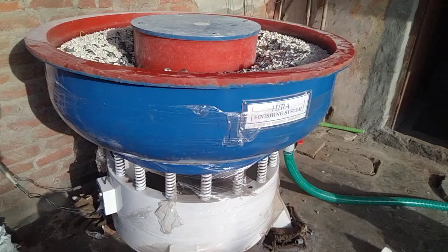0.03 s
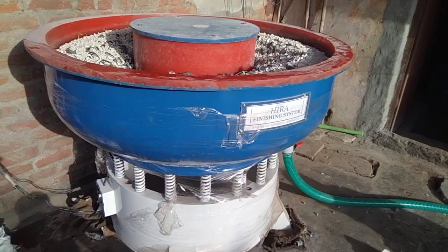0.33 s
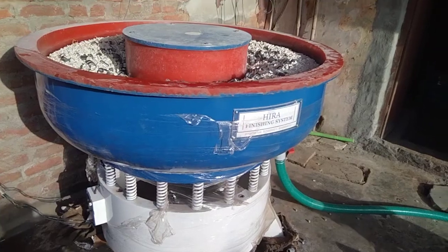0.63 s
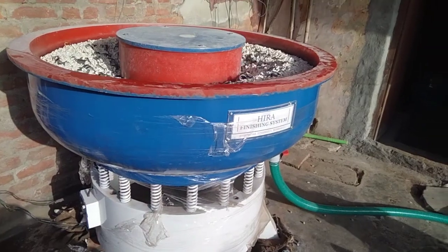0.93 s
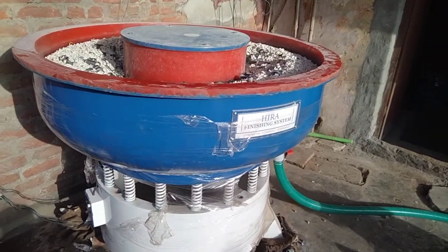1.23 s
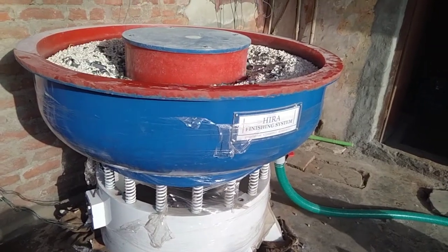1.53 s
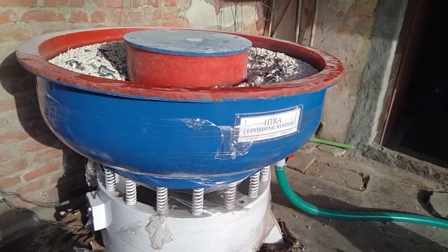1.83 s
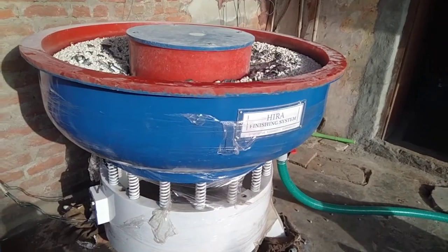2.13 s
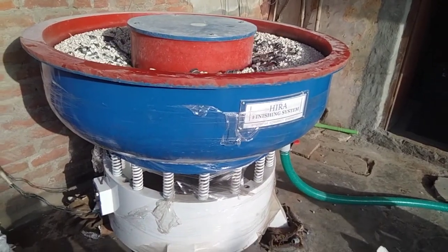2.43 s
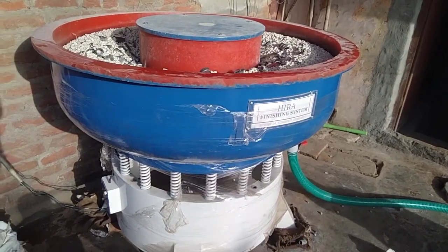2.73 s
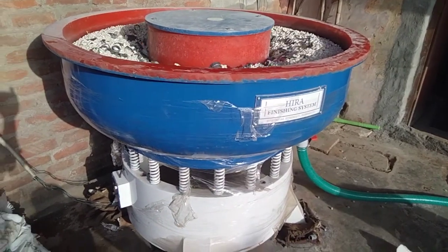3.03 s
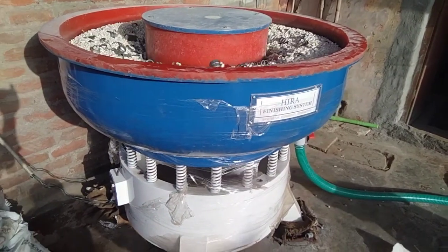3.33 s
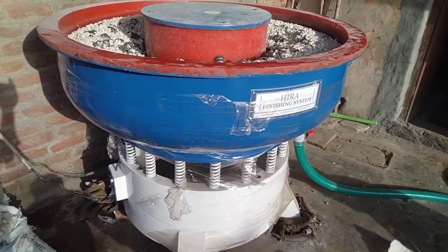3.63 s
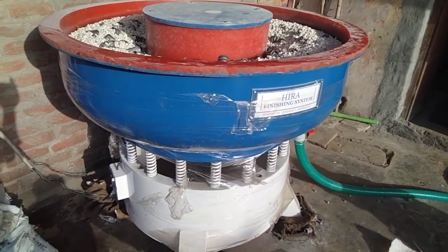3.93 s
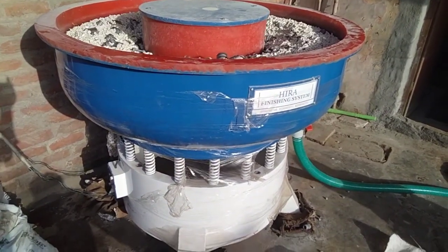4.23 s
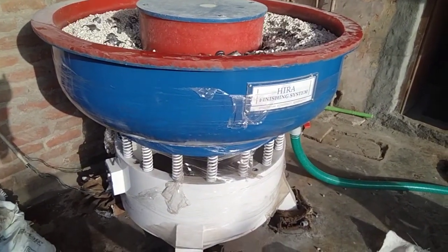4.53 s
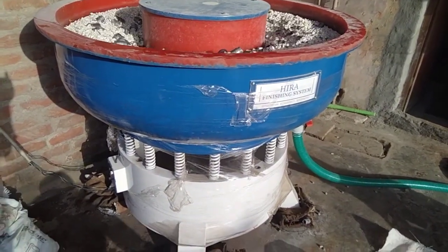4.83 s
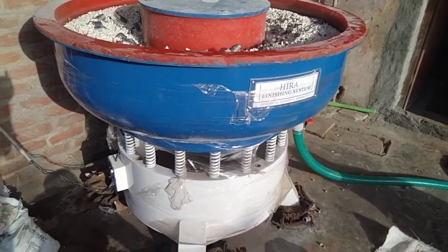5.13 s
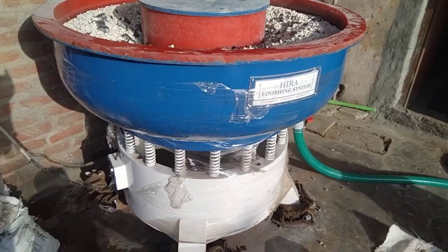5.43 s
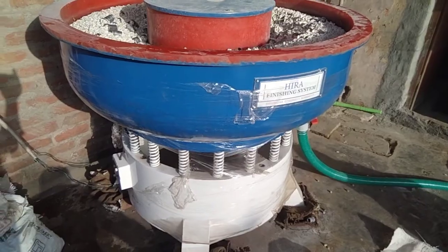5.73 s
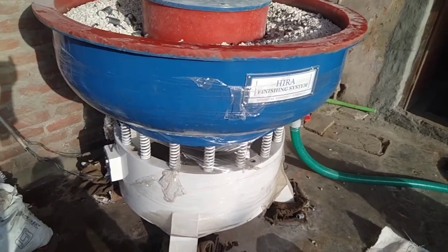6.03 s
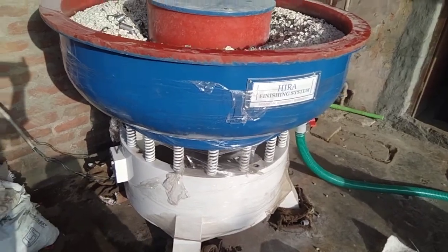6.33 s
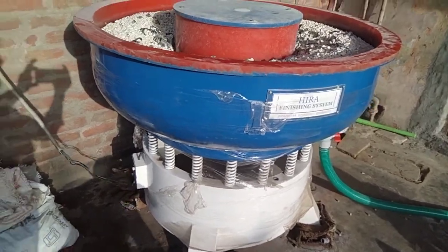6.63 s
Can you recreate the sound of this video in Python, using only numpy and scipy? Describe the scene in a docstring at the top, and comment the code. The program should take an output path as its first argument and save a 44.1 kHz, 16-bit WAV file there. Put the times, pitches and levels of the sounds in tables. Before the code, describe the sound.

After a brief silence, a vibratory finishing machine cuts in, already running close to a single microphone. Its steel bowl drums with a fast, steady rattle over a low shuddering rumble, and a ringing tone gently swells and fades. Ceramic chips click and hiss continuously on top. Steel parts clink now and then, sharpest around the middle, with another quick cluster near the end.

```python
"""A vibratory finishing bowl running on its springs beside a brick wall, close to one mono microphone.
An eccentric weight shakes it about 24 times a second: the load rattles against the steel bowl and the
base shudders on the ground. At the open top ceramic chips seethe, and steel parts clink as they surface.
The sound cuts in after a moment of silence; the sharpest clinks make the recorder's limiter duck."""
import sys
import numpy as np
from scipy.fft import rfft, irfft, next_fast_len
from scipy.io import wavfile
from scipy.ndimage import uniform_filter1d, minimum_filter1d, map_coordinates

SR = 44100
rng = np.random.default_rng(int(sys.argv[2]) if len(sys.argv) > 2 else 0)


def inscribe(sig):
    """Save sig as 16-bit PCM at rate SR to the path in sys.argv[1].

    A 1-D sig is mono; a 2-D sig holds one channel per row.
    Samples are clipped to [-1, 1] before scaling.
    """
    pcm = np.round(np.clip(np.atleast_2d(sig).T, -1, 1) * 32767)
    wavfile.write(sys.argv[1], SR, pcm.astype(np.int16))


N = 294588

SHAFT_HZ = 24.38
# how hard the load works: time_s, rattle_db, clatter_db, hiss_db
LOAD_LEVELS = [(.64, -37, -33.5, -34.5), (1.1, -35.5, -34.5, -31), (2.0, -34, -34, -29.5),
               (2.8, -34.5, -32, -31.5), (3.6, -34, -31, -32.5), (4.4, -34.5, -31, -32),
               (5.2, -34, -31.5, -33), (5.9, -34, -30.5, -33.5), (6.68, -35, -31.5, -31.5)]
# spectrum of the base shuddering on the ground: frequency_hz, level_db
RUMBLE_SPECTRUM = [(10, -17), (32, -4.5), (45, -3.5), (80, -0.5), (115, -5), (170, -8), (400, -27)]
# spectrum of chips knocking together: frequency_hz, level_db
CLICK_SPECTRUM = [(1200, -29.5), (2300, -4), (2700, -1), (3300, 0.5), (3750, -0.5), (4100, -3), (4900, -2),
                  (6000, 1), (6900, -6), (7600, -2), (9500, -27.5), (16000, -12)]
# spectrum of their fine scraping: frequency_hz, level_db
SCRAPE_SPECTRUM = [(3500, -25), (6000, -2), (7500, 1), (8800, 3.5), (9800, -2), (10700, -6), (11500, -2.5),
                   (12400, -5.5), (14000, -5), (15200, 0), (16000, -13)]
# hard, dead strikes of part on part: start_s, peak_db, centre_hz
DEAD_STRIKES = [(2.591, 1.5, 8000), (2.598, -15, 7140), (3.089, -3, 9100), (3.119, -11.5, 7200),
                (3.776, -17, 7000), (6.048, -13, 8100)]
# modes of a steel part: pitch_hz, level_db, ring_time_ratio
STEEL_MODES = [(2600, 29.5, 2.4), (3505, 1, 1.17), (4570, -1, 1), (5050, 4, 1.5), (5290, 8, 1.4),
               (5340, -5, 1.2), (5740, 4.5, 0.63), (6350, 10, 0.33), (7200, -21, .9), (7100, 1.5, 1),
               (7420, 5, 0.35), (7670, 2.5, 0.68), (7810, -10.5, 1.4), (9000, -9, .8), (8460, 6, 0.45),
               (8970, 2, 1.3), (9400, -22, 0.77), (9440, -10, .3), (11300, -5, 0.96), (12700, -5, .8),
               (12520, -3, 0.98), (13100, -9, .5), (13750, -7, .6), (14500, -6, .7), (15400, -8, .5)]
# one part knocks on another; a broader blow wakes more modes:
# start_s, level_db, pitch_hz, spread_octaves, chatter_s, other_pitch_hz, other_relative_db
PART_KNOCKS = [(0.98, -37, 3750, .03, .005, 8900, 0), (1.305, -35, 3700, 0.033, 0.0045, 8900, -8),
               (1.474, -30.5, 8720, .055, .035, 2680, -5), (2.301, -22, 8150, 0.31, 0.043, 5530, -10.5),
               (2.592, -23, 7000, 0.4, .012, 7350, -10), (3.088, -16.5, 7200, 0.54, .007, 9750, -2),
               (3.118, -18, 7600, 0.12, 0.05, 5230, -11), (3.417, -30, 7500, 0.025, .02, 7700, -8),
               (3.776, -24, 5800, .075, .003, 7400, -18), (3.839, -29, 7550, .03, 0.035, 8800, -4),
               (4.053, -27, 5750, 0.11, .01, 5400, -12), (4.474, -31, 2700, .1, .01, 7850, 2),
               (5.821, -28.5, 7200, 0.016, 0.0014, 7600, 8), (6.049, -23.5, 9300, .09, 0.011, 3600, -0.5),
               (6.069, -27, 8760, 0.26, .006, 5700, 2.5), (6.083, -21, 7900, 0.23, .008, 2900, -11),
               (6.09, -27, 13100, 0.28, 0.013, 4507, -1), (6.108, -20, 3550, 0.13, 0.0068, 7900, -1.5),
               (6.161, -28.5, 7500, 0.27, 0.0079, 3550, -13), (6.437, -33, 5340, .03, 0.04, 7500, 1),
               (6.665, -29, 9160, .03, .012, 7500, -12)]
# the lined bowl's broad response: frequency_hz, level_db
BOWL_SPECTRUM = [(50, -32), (120, -2.5), (210, -3.5), (335, 3.5), (385, 1.5), (425, -6.5), (520, 1.5),
                 (620, 0.5), (760, -2), (1130, -3), (1400, -4), (1900, -7), (2400, -11), (4000, -25)]
# resonances of the bowl's wall: pitch_hz, width_hz, level_db
BOWL_WALL_MODES = [(261.4, 2.3, 4), (846, 7.2, 1.5), (1150, 10.6, 1.5), (1293, 14, -6), (1590, 7.9, 1),
                   (1666, 13.5, -1), (2146, 61, -0.5), (2657, 66, -2), (2786, 46, 1.5), (3158, 41, 3)]
# its main resonance: pitch_hz, width_hz, level_db
MAIN_WALL_MODE = [(975, 54, 0)]
# rise and fall of that resonance: time_s, level_db
MAIN_MODE_SWELL = [(0.66, -43), (0.86, -46), (1.07, -39.0), (1.54, -42), (1.75, -38), (2.55, -47),
                   (2.75, -36), (3.02, -44.5), (3.4, -45), (3.58, -35.5), (3.82, -42), (4.0, -41),
                   (4.46, -46.5), (5.14, -39.5), (5.36, -43), (6.1, -40.5), (6.2, -43.0), (6.68, -39)]


def amp(db):
    """Decibels to gain."""
    return 10 ** (np.asarray(db) / 20)


def unit(x):
    """Scale to rms 1."""
    return x / np.sqrt(np.mean(x ** 2) + 1e-20)


def levels(rows):
    """One gain per sample for each dB column after the time."""
    time_s, *columns = np.transpose(rows)
    return [amp(np.interp(np.arange(N) / SR, time_s, db)) for db in columns]


def wobble(rate):
    """A smooth random curve, rate knots a second."""
    return map_coordinates(rng.standard_normal(int(N * rate / SR) + 4), [np.arange(N) * rate / SR])


def filtered(x, response):
    """x through a gain that depends on frequency."""
    size = next_fast_len(len(x) + SR // 2)
    return irfft(rfft(x, size) * response(np.fft.rfftfreq(size, 1 / SR)), size)[:len(x)]


def coloured(x, spectrum):
    """x through a (frequency_hz, level_db) spectrum, at rms 1."""
    hz, db = np.transpose(spectrum)
    return unit(filtered(x, lambda f: amp(np.interp(np.log(f + 1), np.log(hz), db))))


def resonate(x, modes):
    """x through (pitch_hz, width_hz, level_db) resonances, at rms 1."""
    return unit(filtered(x, lambda f: sum(
        amp(db) * 1j * f * width / (hz * hz - f * f + 1j * f * width) for hz, width, db in modes)))


def band(hz, centre_hz, octaves):
    """Weight that falls away on both sides of a centre frequency."""
    return 1 / (1 + (np.log2((hz + 1) / centre_hz) / octaves) ** 4)


def add(track, start_s, sound):
    """Mix a sound into a track."""
    part = track[round(start_s * SR):][:len(sound)]
    part += sound[:len(part)]


def swing():
    """The eccentric weight swings the bowl between -1 and 1 once a turn."""
    return np.cos(2 * np.pi * SHAFT_HZ * np.arange(N) / SR)


def collisions(per_s, depth, spread_db=0):
    """Random impacts of loose chips, thickest when the bowl rises into them."""
    hit = rng.random(N) < per_s / SR * (1 + depth * swing())
    size = rng.standard_normal(N) * amp(spread_db * rng.uniform(-1.2, 1, N))
    return unit(hit * size)


def ground_rumble():
    """Underneath, the base shudders on the ground."""
    _, clatter, _ = levels(LOAD_LEVELS)
    return amp(-11 + 0.63 * wobble(10)) * clatter * coloured(rng.standard_normal(N), RUMBLE_SPECTRUM)


def air_throb(level_db=-38.5):
    """The bowl pumps the air at the microphone once a turn."""
    return amp(level_db) * swing()


def buried_pings(per_s=130, low_hz=2600, high_hz=9800, t60_s=0.13, relative_db=-9):
    """Half-buried parts and chips ring faintly all the time."""
    _, clatter, _ = levels(LOAD_LEVELS)
    out, t = np.zeros(N), np.arange(SR // 8) / SR
    for when, pitch, size in rng.random((int(per_s * N / SR), 3)):
        hz = low_hz * (high_hz / low_hz) ** pitch
        envelope = amp(0.5 * np.log(size + .05) - 60 * t / t60_s)
        add(out, when * (N - 1) / SR, envelope * np.sin(2 * np.pi * hz * t))
    return amp(relative_db) * clatter * unit(out)


def ceramic_chips():
    """Thousands of ceramic chips click and scrape at the open top."""
    _, clatter, hiss = levels(LOAD_LEVELS)
    click_gain = clatter * amp(0.19 * wobble(12))
    clicks = coloured(collisions(per_s=9000, depth=.22), CLICK_SPECTRUM)
    scrape_gain = hiss * amp(0.86 * wobble(7.2))
    scrape = coloured(collisions(per_s=20000, depth=.18, spread_db=2.2), SCRAPE_SPECTRUM)
    return click_gain * clicks + scrape_gain * scrape


def dead_strikes(t60_s=0.022, octaves=0.32):
    """Parts held by the load meet with a bright crack and no ring."""
    out, t = np.zeros(N), np.arange(SR // 10) / SR
    for start_s, peak_db, centre_hz in DEAD_STRIKES:
        noise = filtered(rng.standard_normal(len(t)), lambda f: band(f, centre_hz, octaves))
        crack = noise * amp(-60 * t / t60_s)
        add(out, start_s, amp(peak_db) * crack / np.abs(crack).max())
    return out


def drifting_tones(hz, t, step_rad=0.029):
    """One sine a mode, its phase nudged by shifting contacts."""
    phase = 2 * np.pi * (hz * t + rng.random(hz.shape))
    drift = step_rad * np.cumsum(rng.standard_normal((len(hz), len(t))), axis=1)
    return np.sin(phase + drift)


def beating_modes(hz, t, twin_gain=0.58, max_detune=0.0141):
    """Parts are not quite round: each mode beats with a weaker twin."""
    tones = drifting_tones(hz, t)
    twin_hz = hz * (1 + max_detune * rng.uniform(-1, 1, hz.shape))
    return (tones + twin_gain * drifting_tones(twin_hz, t)) / np.hypot(1, twin_gain)


def steel_part(pitch_hz, octaves, chatter_s, rise_s=0.001, grit_t60_s=0.33, taps_per_s=180, tap_db=2.5):
    """A steel part is struck, chatters grittily against the chips and then rings on."""
    t = np.arange(SR // 2) / SR
    hz, mode_db, ring_time_ratio = np.transpose(STEEL_MODES)[:, :, None]
    since_chatter_s = np.maximum(t - chatter_s, 0)
    # a looser part chatters longer and rings longer
    t60_s = 0.29 * (chatter_s / 0.019) ** 0.38 * ring_time_ratio
    grit = 1.3 * np.sqrt(octaves)  # broad blows are gritty
    spill = 0.26 * grit * (hz > pitch_hz)  # some grit reaches the modes above the pitch
    weight = (band(hz, pitch_hz, octaves) + spill) * amp(mode_db)
    envelopes = np.sqrt(2) * weight / np.linalg.norm(weight) * amp(-60 * since_chatter_s / t60_s)
    ring = (envelopes * beating_modes(hz, t)).sum(axis=0) * (1 - np.exp(-t / rise_s))
    taps = amp(tap_db * np.interp(t * taps_per_s, np.arange(len(t)), rng.standard_normal(len(t))))
    noise = filtered(rng.standard_normal(len(t)), lambda f: band(f, pitch_hz, octaves))
    scrape = unit(taps * noise) * amp(-60 * since_chatter_s / grit_t60_s)
    return (ring + grit * scrape) / np.hypot(1, grit)


def steel_clinks(other_octaves=0.079):
    """Two parts meet at the surface and both ring, the second mostly in its nearest modes."""
    out = np.zeros(N)
    for start_s, db, pitch_hz, octaves, chatter_s, other_hz, other_db in PART_KNOCKS:
        add(out, start_s, amp(db) * steel_part(pitch_hz, octaves, chatter_s))
        add(out, start_s, amp(db + other_db) * steel_part(other_hz, other_octaves, chatter_s))
    return out


def packed_rattle(jitter_s=.0001, harmonics=180, turn_samples=8192):
    """The packed load repeats one rattle every turn; its timing slips, blurring the high harmonics."""
    one_turn = irfft(np.r_[0, np.exp(2j * np.pi * rng.random(harmonics))], turn_samples)
    slip_s = jitter_s * (wobble(400) + wobble(25))
    position = (np.arange(N) / SR + slip_s) * SHAFT_HZ % 1 * turn_samples
    return unit(map_coordinates(one_turn, [position], order=1, mode="grid-wrap"))


def steel_bowl(flutter_db=.5, flutter_per_s=12):
    """Close to the microphone, repeating and loose impacts drum on the bowl and set its wall ringing."""
    rattle, clatter, _ = levels(LOAD_LEVELS)
    swell, = levels(MAIN_MODE_SWELL)
    packed = packed_rattle() * (1 + 0.11 * swing())
    loose = amp(8.5) * collisions(per_s=6000, depth=.22, spread_db=2)
    impacts = unit(packed + loose)
    body = rattle * coloured(impacts, BOWL_SPECTRUM)
    flutter = amp(-0.5 + flutter_db * wobble(flutter_per_s))
    main_ring = flutter * swell * resonate(impacts, MAIN_WALL_MODE)
    wall_ring = amp(-8) * clatter * resonate(impacts, BOWL_WALL_MODES)
    return body + main_ring + wall_ring


def scene():
    """The whole machine from close by, alike in both channels."""
    machine = steel_bowl() + air_throb() + ground_rumble()
    load = ceramic_chips() + steel_clinks() + dead_strikes() + buried_pings()
    return np.tile(machine + load, (2, 1))


def limiter(x, ceiling=0.49, ahead_s=.006, hold_s=.1):
    """The recorder ducks just ahead of a peak, holds its gain and lets go quickly."""
    ahead, hold = int(ahead_s * SR), int(hold_s * SR)
    needed = np.minimum(1, ceiling / (np.abs(x) + 1e-9))
    held = minimum_filter1d(needed, ahead + hold, origin=(hold - ahead) // 2)
    return x * uniform_filter1d(held, ahead // 2)


def record(dry, start_s=0.6395, top_hz=15850):
    """One microphone into a limiter and a steep treble cut; silent until start_s."""
    live = limiter(dry.mean(axis=0)) * (np.arange(N) / SR > start_s)
    return np.tile(filtered(live, lambda hz: 1 / (1 + (hz / top_hz) ** 400)), (2, 1))


dry = scene()
out = record(dry)
inscribe(out)
```